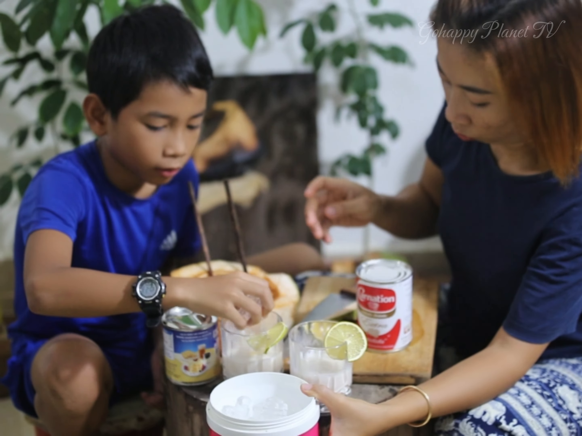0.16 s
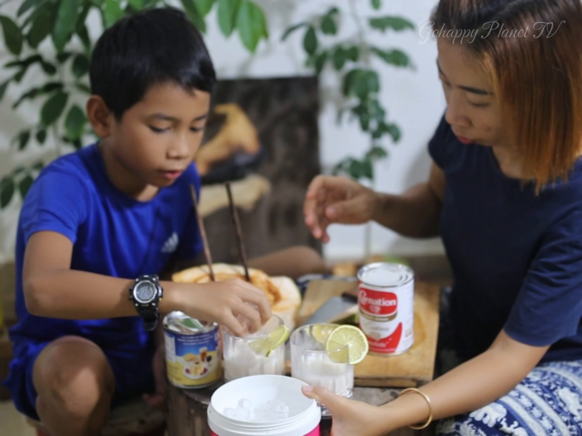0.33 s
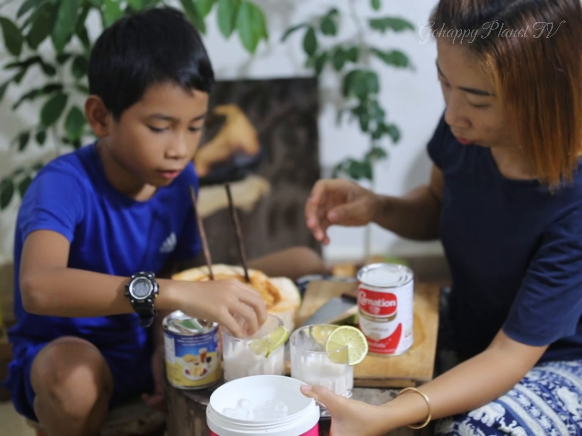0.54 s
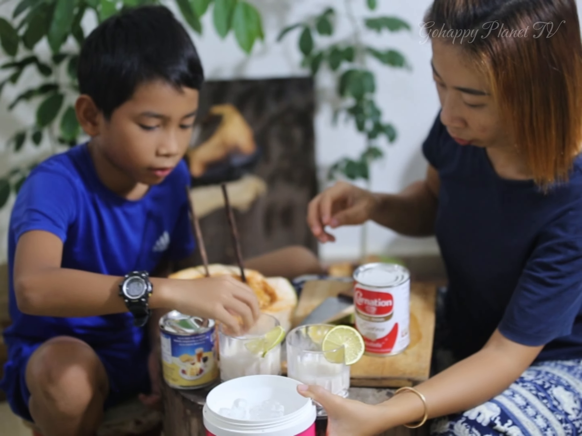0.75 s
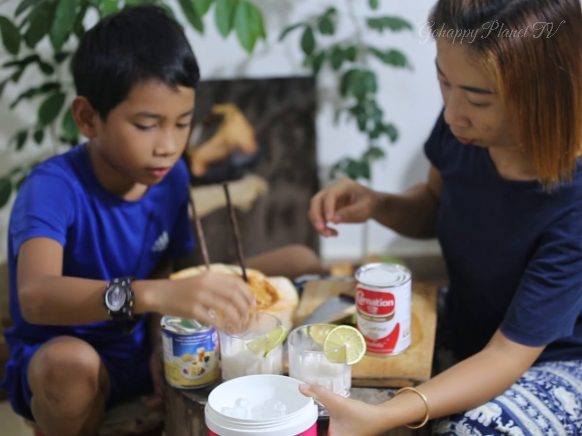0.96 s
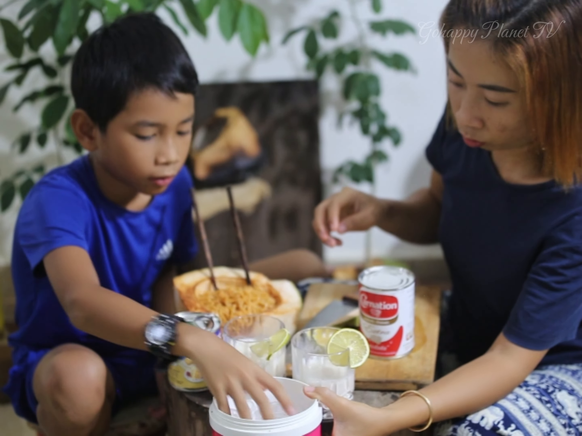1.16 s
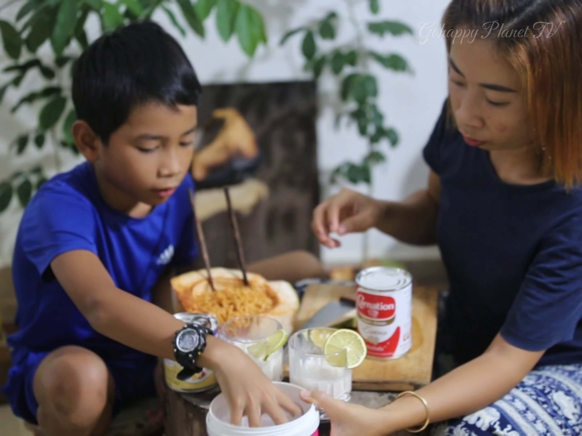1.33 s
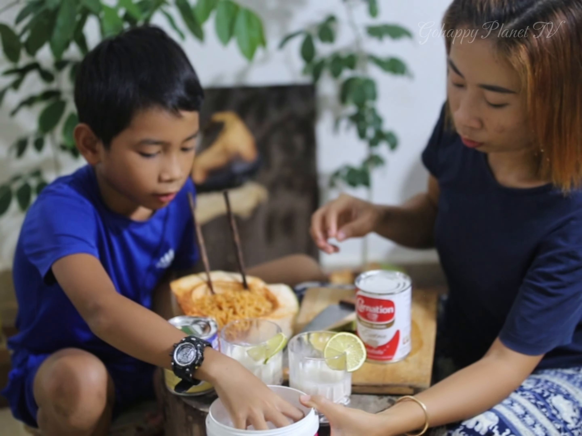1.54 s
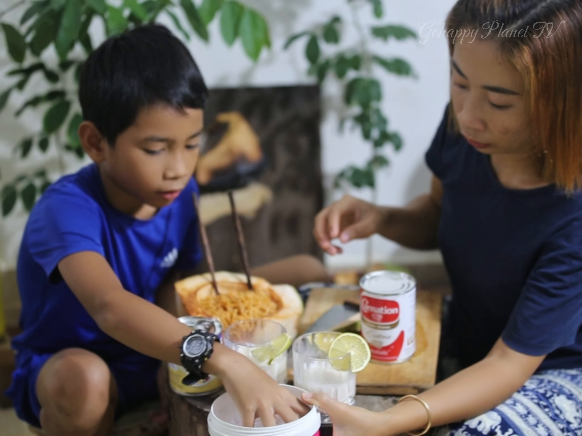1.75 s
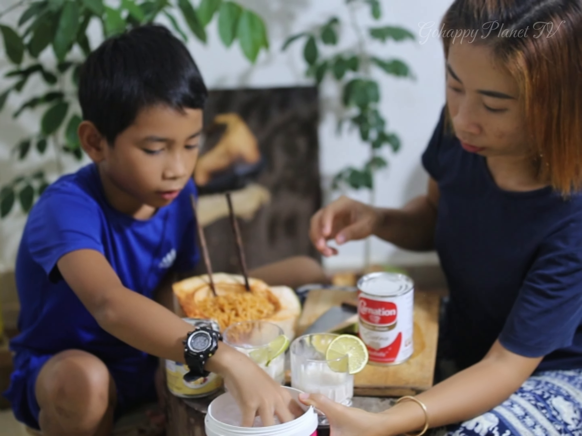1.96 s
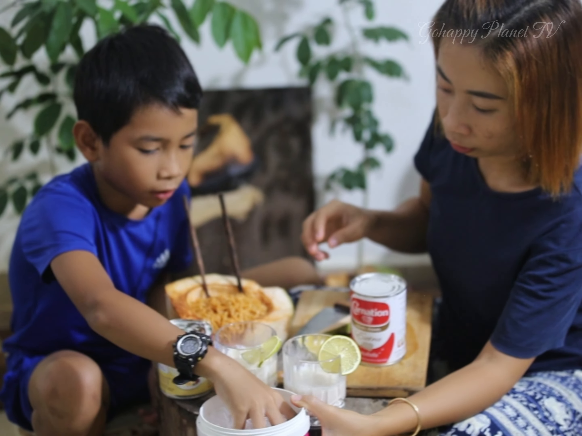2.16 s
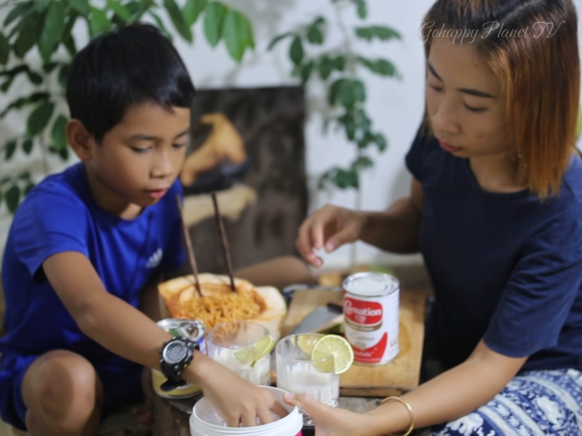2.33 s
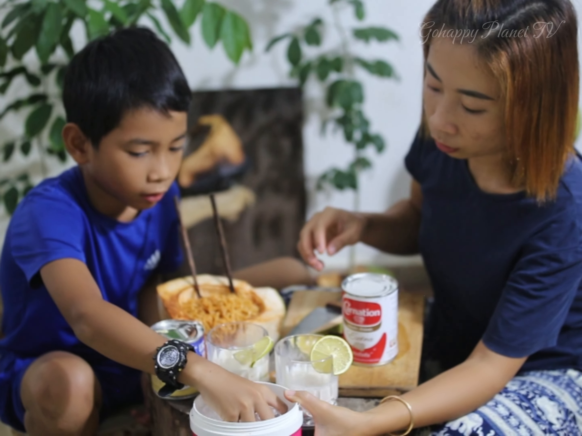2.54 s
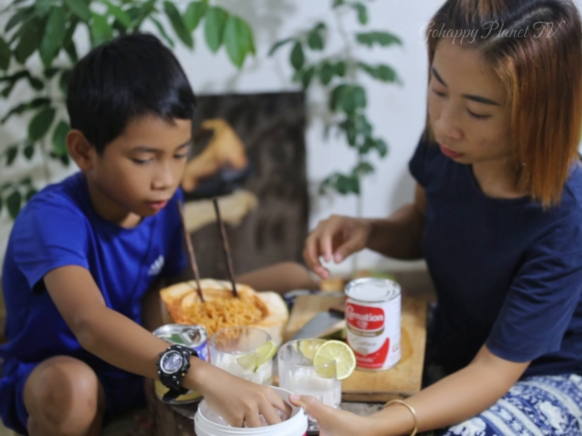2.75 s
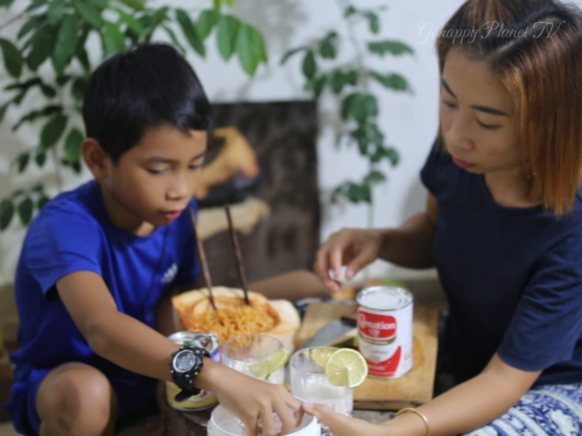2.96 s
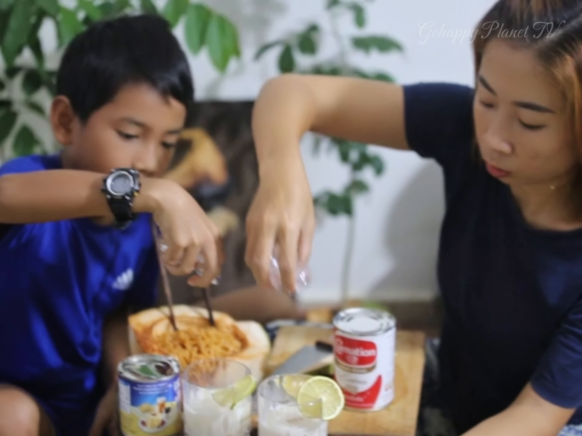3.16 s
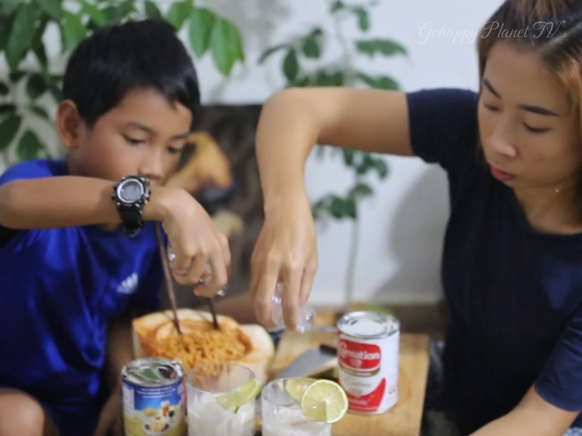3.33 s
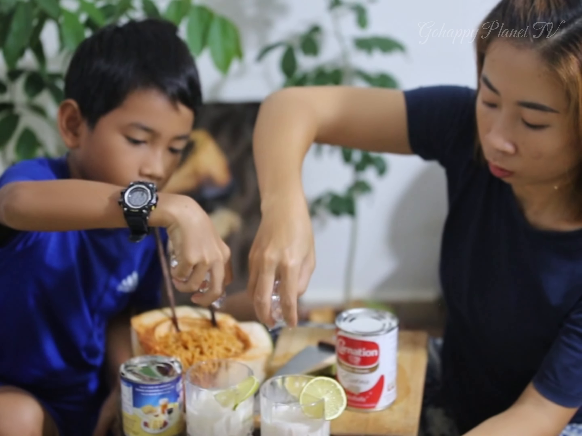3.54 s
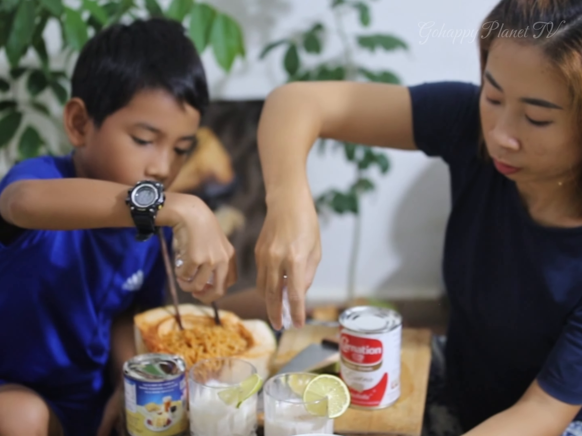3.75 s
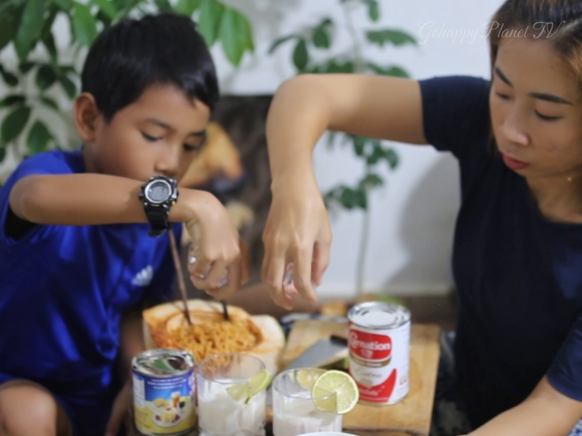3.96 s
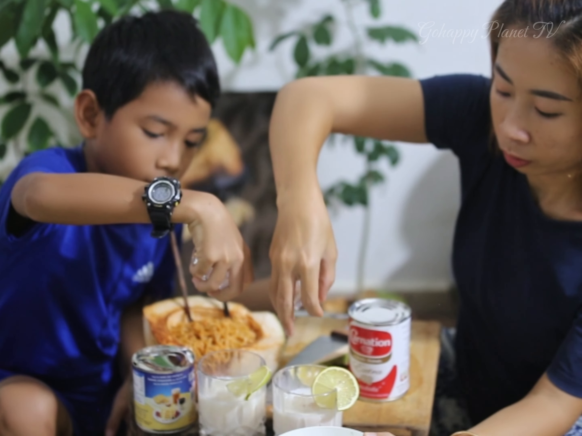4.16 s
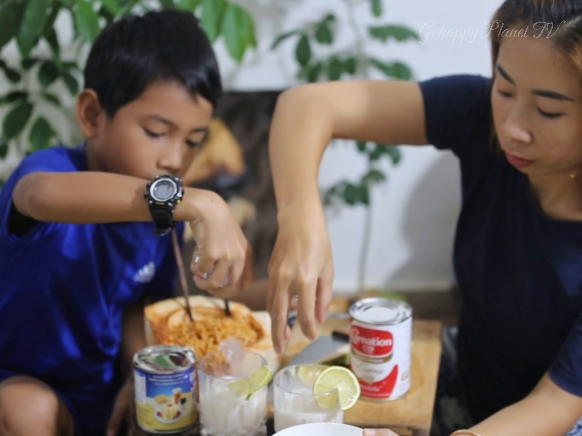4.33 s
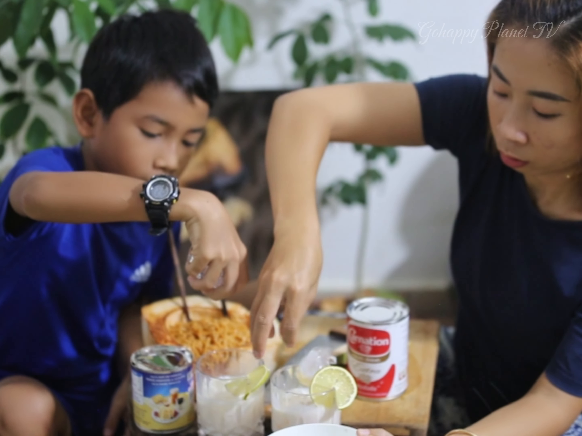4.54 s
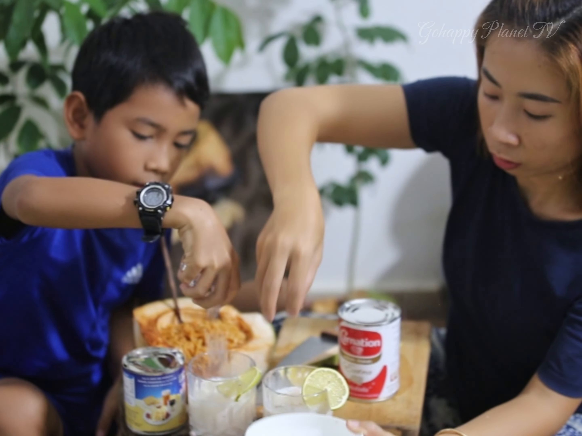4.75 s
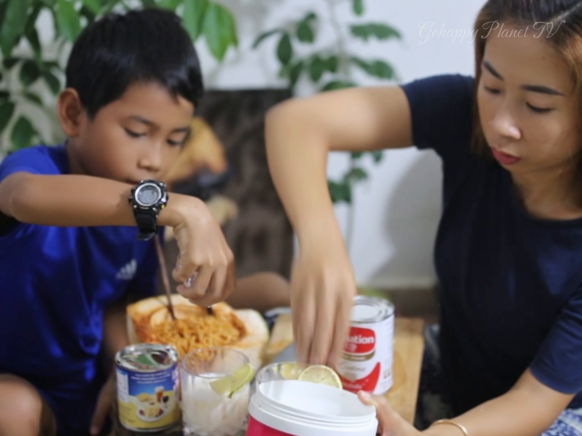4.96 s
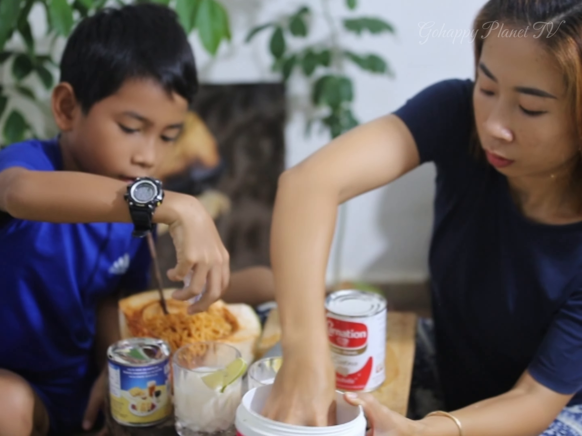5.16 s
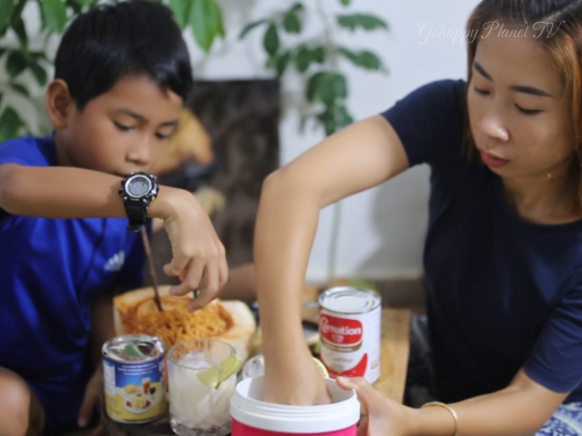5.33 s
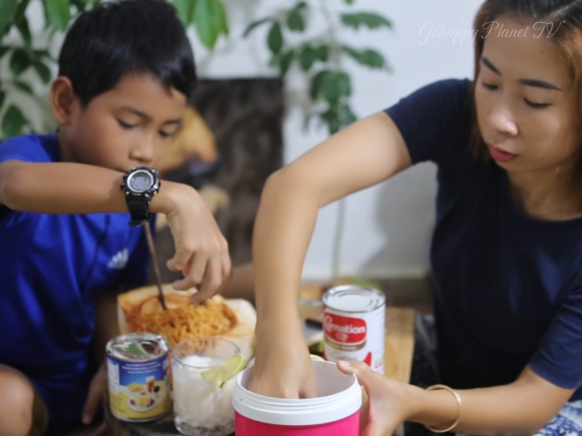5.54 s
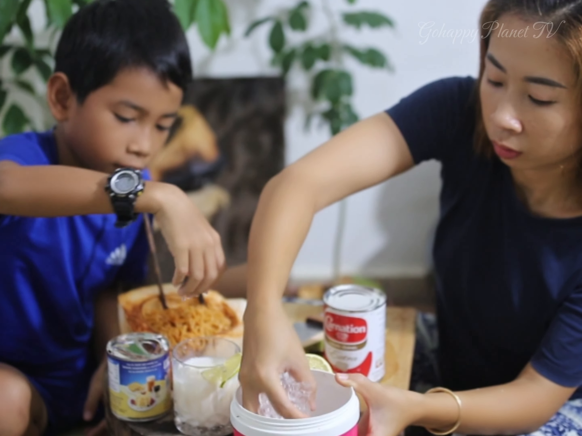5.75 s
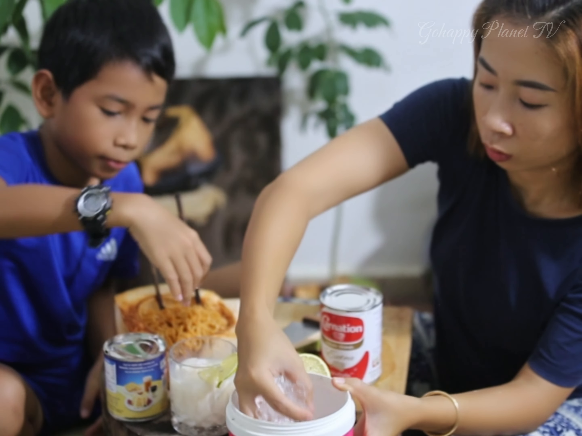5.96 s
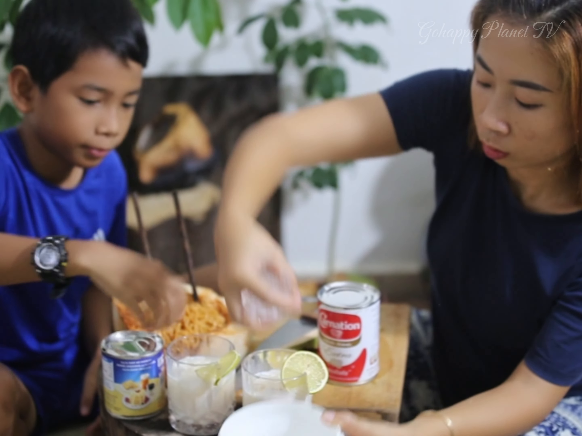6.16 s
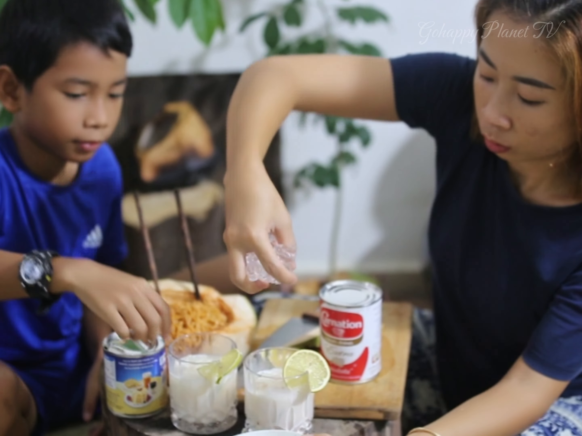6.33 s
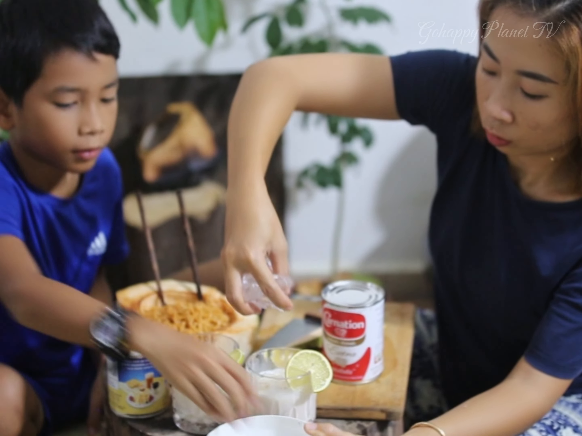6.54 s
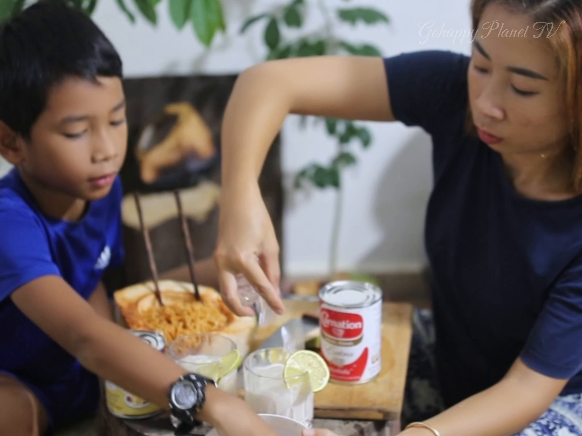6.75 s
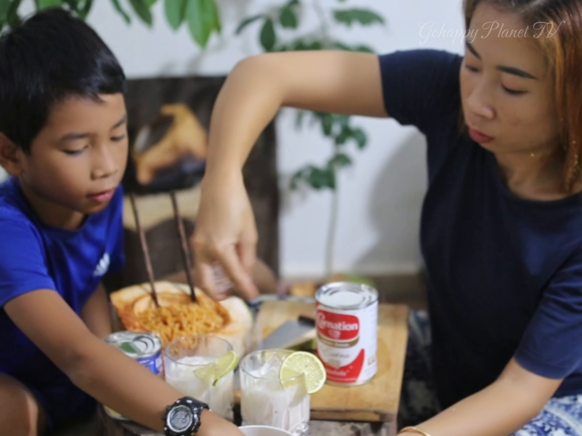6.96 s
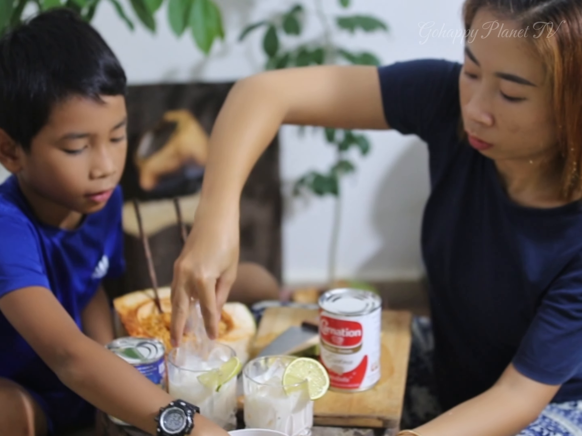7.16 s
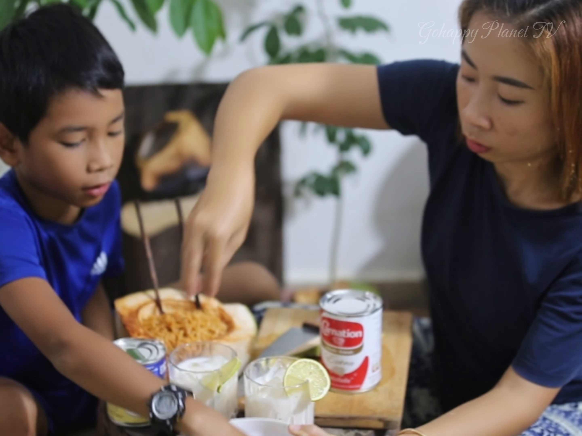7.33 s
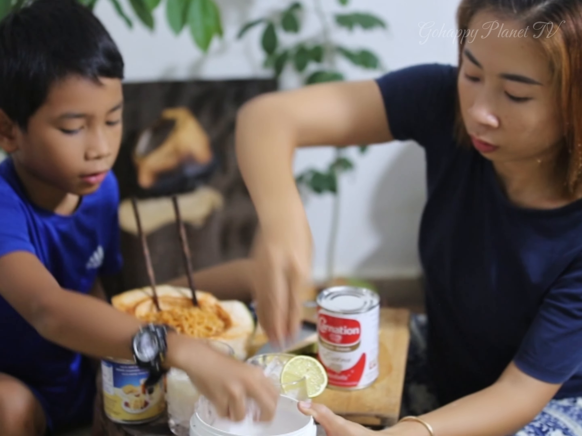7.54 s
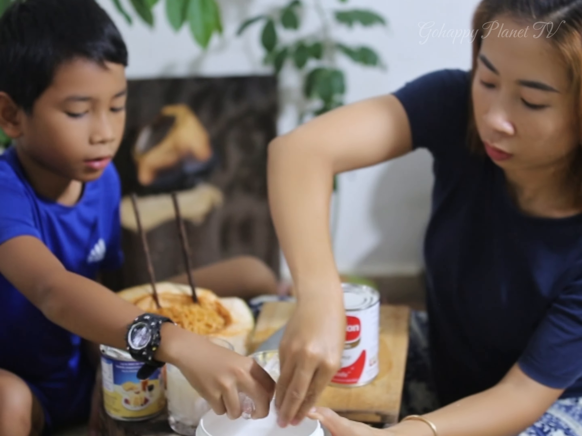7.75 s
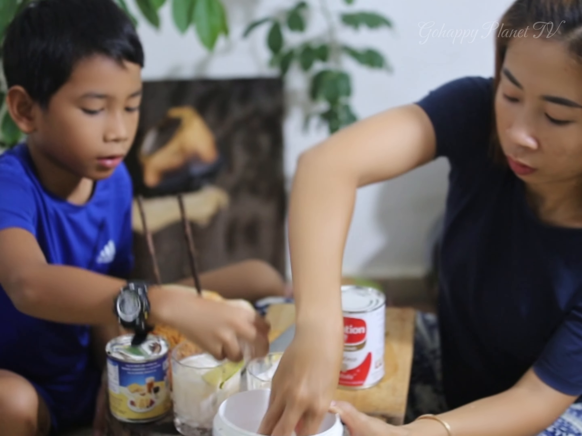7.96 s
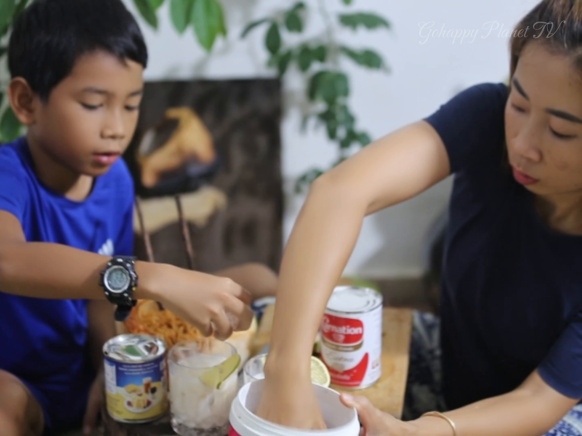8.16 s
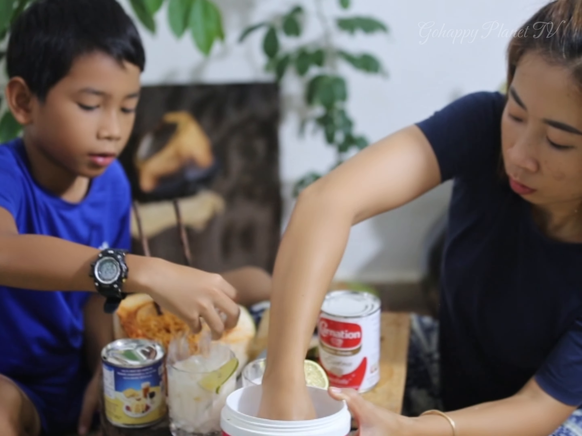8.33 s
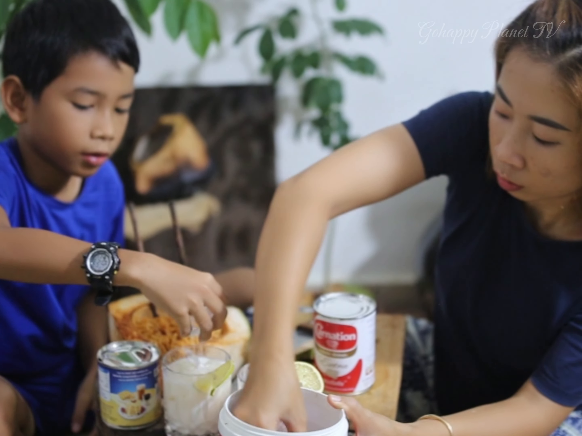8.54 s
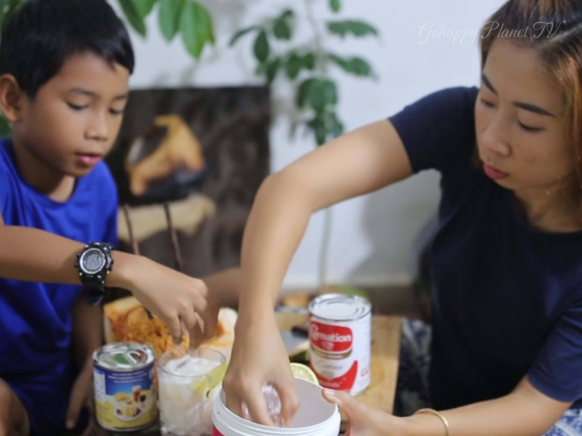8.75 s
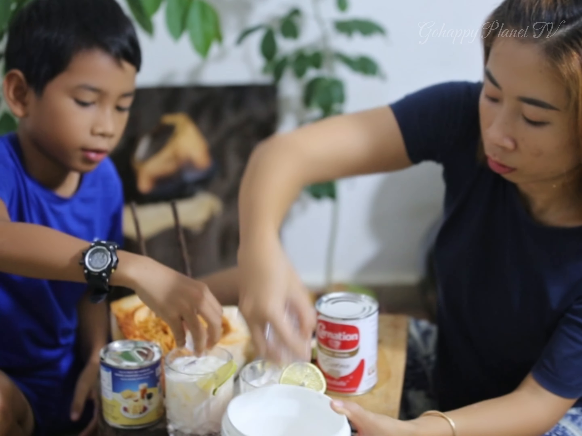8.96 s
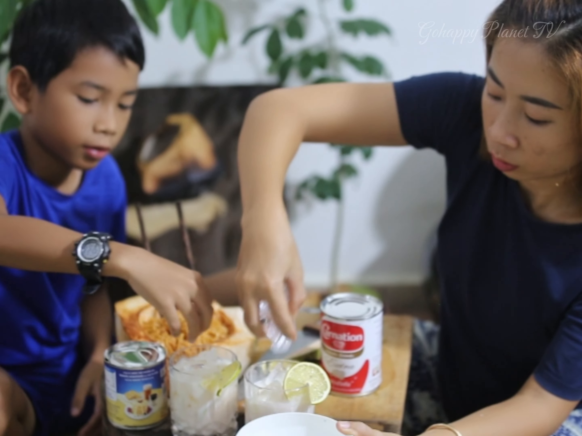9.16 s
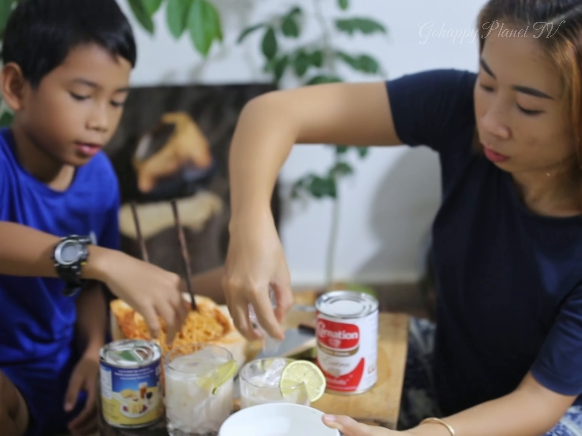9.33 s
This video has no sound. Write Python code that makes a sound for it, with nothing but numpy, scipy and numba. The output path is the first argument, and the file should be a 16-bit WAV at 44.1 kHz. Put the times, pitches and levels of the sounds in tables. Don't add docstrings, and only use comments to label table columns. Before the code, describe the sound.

Close up in a small quiet room, ice lands in drinking glasses with bright clinks and soft plops. A hand then digs through a plastic tub, pieces chattering and lumps knocking the wall. After a very brief silence, harder drops ring the fuller glasses, followed by more crunchy scooping, splitting snaps, wet slush and a few last chinks over low hum.

```python
import sys
import numpy as np
from scipy import signal
from scipy.fft import rfft, irfft, next_fast_len
from scipy.io import wavfile
from numba import njit

SR = 44100
rng = np.random.default_rng(int(sys.argv[2]) if len(sys.argv) > 2 else 0)


def log_audio(samples):
    frames = np.atleast_2d(samples).T
    limited = np.clip(frames, -1, 1)
    pcm = np.round(limited * 32767).astype(np.int16)
    wavfile.write(sys.argv[1], SR, pcm)


def amp(db):
    return 10 ** (np.asarray(db, float) / 20)


N = 414540
# (start_s, end_s)
SILENCE_S = (3.029, 3.142)


def level(x, db):
    return x * amp(db) / np.sqrt(np.mean(x ** 2))


def on_log(table, hz):
    f, db = np.transpose(table)
    return np.interp(np.log(hz), np.log(f), db)


def high_pass(x, order, hz):
    return signal.sosfilt(signal.butter(order, hz, "high", fs=SR, output="sos"), x)


def walk(rate_hz):
    return np.interp(np.arange(N) * rate_hz / SR, np.arange(1000), rng.standard_normal(1000))


@njit
def rings(size, start, hz, t60, gain, glide):
    out = np.zeros(size)
    for k in range(len(start)):
        p = np.exp(2j * np.pi * hz[k] / SR - np.log(1000.) / (t60[k] * SR))
        turn = np.exp(2j * np.pi * hz[k] * glide / (t60[k] * SR * SR))
        z = gain[k] + 0j
        for i in range(start[k], min(size, start[k] + int(t60[k] * SR))):
            out[i] += z.imag
            z *= p
            p *= turn
    return out


def ring(s, hz, t60, gain, glide=0.):
    s, hz, t60, gain = (np.ravel(v).astype(float) for v in np.broadcast_arrays(s, hz, t60, gain))
    start = np.clip(s * SR, 0, N).astype(np.int64)
    return rings(N, start, np.clip(hz, 20, SR / 2.2), np.clip(t60, .001, 1), gain, glide)


def knocks(s, db, hz, t60, lasting_s, spread_db, glide=0.):
    delay, detune = rng.random((2, 8, len(s)))
    return ring(s + lasting_s * delay, hz * amp(spread_db * (detune - .5)), t60, amp(db), glide)


def resonate(x, modes):
    out = 0
    for hz, db, t60 in modes:
        r = np.exp(-np.log(1000) / (t60 * SR))
        poles = [1, -2 * r * np.cos(2 * np.pi * hz / SR), r * r]
        out = out + level(signal.lfilter([1, 0, -1], poles, x), db)
    return out


# (pitch_hz, density_db)
HUM_SPECTRUM = [(12, -28), (20, 0), (99, 1.5), (265, 6.5), (323, -0.5), (382, 3), (652, -5), (2580, -10.5),
                (5520, -28), (7730, -28.5), (13900, -19), (15200, -20.5), (16500, -41.5)]
# (pitch_hz, level_db, t60_s)
WHINE_MODES = [(12300, -81, .03), (13800, -93, 0.036)]
HUM_DB, HUM_BEFORE_SILENCE_DB = -55, 5.5


def hum():
    size = next_fast_len(N)
    hz = np.maximum(np.fft.rfftfreq(size, 1 / SR), 1)
    spectrum = rfft(rng.standard_normal(size)) * amp(on_log(HUM_SPECTRUM, hz))
    swell = walk(1.0)
    out = 0
    for centre_octave in np.arange(4, 16, 1.5):
        band = np.clip(1 - np.abs(np.log2(hz) - centre_octave) / 1.5, 0, 1)
        waver_db = 0.15 * swell + 3.5 * walk(12.0)
        out = out + irfft(spectrum * band, size)[:N] * amp(waver_db)
    later = np.arange(N) / SR > SILENCE_S[0]
    step_db = np.where(later, 0, HUM_BEFORE_SILENCE_DB)
    return level(out, HUM_DB) * amp(step_db) + resonate(rng.standard_normal(N), WHINE_MODES)


def room(near):
    t60_s, room_db = 0.19, -10
    age = np.arange(SR // 2) / SR
    echo = rng.standard_normal(len(age)) * amp(-60 * age / t60_s) * (age > .004)
    echo = signal.lfilter([1], [1, -.4], echo)
    echo = echo / np.sqrt(np.sum(echo ** 2))
    return amp(room_db) * signal.fftconvolve(near, echo)[:N]


# (start_s, peak_db, pitch_hz)
CLOSE_CLICKS = [
    (0.2104, -12, 3600),
    (3.2165, -31, 8500),
    (3.2228, -16, 2000),
    (3.2237, -25.5, 7300),
    (4.8756, -5, 3420),
    (4.8765, -1, 4230),
    (7.224, -10, 4500),
]


def clicks():
    cycles, bounce_s, bounce_db = 3.4, 0.0034, -18
    s, db, hz = np.transpose(CLOSE_CLICKS)
    first = ring(s, hz, cycles / hz, amp(db))
    return first + ring(s + bounce_s, hz, cycles / hz, amp(db + bounce_db))


# (start_s, peak_db, pitch_hz, t60_s)
AIR_PLOPS = [(0.369, -26.5, 192, 0.04), (0.522, -25, 1446, 0.022), (0.824, -25.5, 1122, 0.11),
             (0.844, -29, 1294, 0.087), (0.847, -25.5, 387, 0.051), (0.884, -21, 890, 0.026),
             (0.893, -19.5, 1430, 0.065), (1.04, -23.5, 980, 0.024), (3.559, -14, 1580, 0.049),
             (3.6, -19, 1725, 0.045), (3.865, -26.5, 1360, 0.064), (4.583, -20, 230, 0.033),
             (4.618, -21.5, 1590, 0.04), (4.718, -19.5, 1692, 0.047), (5.024, -28, 453, 0.014),
             (6.234, -28.5, 204, 0.029), (6.316, -32, 316, 0.021), (6.345, -39, 248, 0.015),
             (8.892, -18, 493, 0.034), (9.062, -26.5, 193, 0.03)]
# (start_s, peak_db, pitch_hz, t60_s)
HELD_TAPS = [
    (1.4143, -29, 1400, 0.018),
    (3.261, -35.5, 2130, 0.012),
    (4.2, -31.5, 1870, 0.015),
    (6.2455, -34, 1010, 0.0082),
]


def plops():
    return amp(-8.0) * knocks(*np.transpose(AIR_PLOPS + HELD_TAPS), lasting_s=.018, spread_db=2.84, glide=0.033)


# (start_s, peak_db, pitch_hz)
CUBE_CHINKS = [(0.238, -22, 2480), (0.4344, -27, 2550), (0.7544, -17, 3140), (0.8929, -15, 3520),
               (1.2077, -38, 3880), (3.5642, -7.5, 2800), (3.8364, -6.5, 3260), (3.9521, -19, 3140),
               (4.8745, -0.5, 3480), (4.9477, -14.5, 3590), (7.0753, -34, 3700), (7.2704, -13, 3750),
               (9.124, -18, 3830), (9.198, -22.5, 3060), (9.315, -23, 2800)]


def cubes():
    return amp(-15.0) * knocks(*np.transpose(CUBE_CHINKS), t60=0.023, lasting_s=0.031, spread_db=2.0)


# (start_s, peak_db, pitch_hz)
DRY_TICKS = [(0.214, -13, 2920), (3.162, -32, 921), (7.2049, -21, 11000), (7.223, -16, 9000),
             (7.715, -15, 5060), (5.147, -6.5, 1750), (5.969, -22, 3080), (6.318, -30, 1170),
             (7.225, -15, 2730), (7.432, -15.5, 3920), (8.791, -13, 1750), (8.958, -10, 1700)]


def ticks():
    return amp(-16.0) * knocks(*np.transpose(DRY_TICKS), t60=.007, lasting_s=0.0013, spread_db=14.6)


# (start_s, peak_db, pitch_hz)
SLUSH_SMEARS = [(0.215, -39, 1240), (0.24, -32, 3200), (0.81, -21.5, 1210), (0.83, -30, 8560),
                (0.87, -27, 3500), (0.91, -25.5, 1690), (3.245, -42, 3000), (3.87, -24, 1280),
                (3.992, -30, 1410), (4.039, -28, 1470), (4.27, -39, 6240), (4.285, -39, 4200),
                (4.461, -25, 6300), (4.612, -21, 1300), (4.655, -31, 7000), (4.7, -25, 2660),
                (5.125, -22, 3800), (5.175, -19, 4000), (5.18, -17, 1440), (8.09, -35, 804),
                (8.17, -26, 770), (8.502, -22, 1540), (8.601, -17, 1490), (8.7, -18.5, 1710),
                (9.124, -30, 4300), (9.314, -40, 3500)]


def slush():
    return amp(-9.5) * knocks(*np.transpose(SLUSH_SMEARS), t60=0.03, lasting_s=.04, spread_db=2.3)


# (start_s, peak_db, pitch_hz)
ICE_SNAPS = [(3.164, -44, 2900), (8.1104, -28, 1700), (8.1292, -21, 1500), (3.239, -46, 2500),
             (3.951, -14, 3600), (3.958, -10, 3000), (4.881, -7, 3630), (5.15, -13, 3750),
             (0.2126, -12.5, 3970), (7.435, -12, 3940), (7.439, -15, 3900), (8.79, -27, 2500),
             (1.411, -25, 1600), (9.314, -25, 4800), (5.301, -20, 4240), (5.41, -10, 4580),
             (5.683, -20, 5500), (5.848, -20, 5300), (7.287, -8, 5030), (7.309, -19, 3500),
             (7.535, -24, 2980), (9.066, -24, 4470)]


def snaps():
    return amp(-17) * knocks(*np.transpose(ICE_SNAPS), t60=0.011, lasting_s=.0008, spread_db=7)


# (start_s, peak_db, pitch_hz)
TUB_KNOCKS = [(1.289, -28, 476), (1.56, -33, 541), (2.005, -23.5, 522), (2.289, -32, 549),
              (5.144, -19, 456), (5.195, -38, 457), (5.302, -20, 442), (5.347, -21, 556),
              (5.534, -23.5, 552), (5.793, -31, 458), (5.934, -30.5, 542), (5.968, -28, 555),
              (7.06, -23, 575), (7.535, -22.5, 564), (7.611, -24.5, 633), (7.716, -29, 607),
              (8.094, -26, 461), (8.18, -20, 563), (8.329, -16, 565), (8.414, -16, 600), (8.5, -21, 570),
              (8.644, -16, 524), (8.959, -33, 432)]


def tub_knocks():
    return amp(-12.5) * knocks(*np.transpose(TUB_KNOCKS), t60=0.085, lasting_s=0.0141, spread_db=1.0)


# (start_s, peak_db, pitch_hz, t60_s)
GLASS_SINGS = [(0.218, -14.5, 2166, 0.11), (0.433, -36, 3160, 0.12), (0.751, -31, 3150, 0.16),
               (3.575, -24, 5350, 0.12), (3.665, -44, 3000, .1), (3.835, -38, 2060, 0.23),
               (3.83, -28, 6660, .1), (4.02, -41, 3030, 0.16), (4.15, -50, 5200, .08),
               (4.416, -21, 2026, 0.26), (4.43, -34.5, 5100, 0.56), (4.572, -39, 14100, .2),
               (4.572, -34, 9250, .2), (4.93, -23.5, 2000, 0.12), (4.955, -36, 9240, 0.13),
               (5.02, -48, 5060, .2), (5.396, -22, 1988, 0.27), (5.41, -30, 5000, 0.15),
               (6.81, -30, 1820, .1), (7.073, -35, 6660, 0.044), (7.272, -22, 1930, .12),
               (7.342, -29, 1950, 0.17), (8.238, -14, 1846, 0.081), (9.045, -46, 1780, 0.14),
               (9.105, -41, 1860, .12), (9.155, -33, 1760, 0.1), (9.13, -41, 8250, .07),
               (9.233, -40, 1870, 0.1), (9.209, -45, 3150, .12)]
# (start_s, peak_db, pitch_hz, t60_s)
WALL_RINGS = [
    (0.452, -48, 2083, .5),
    (0.445, -58, 5246, .35),
    (0.815, -47, 5237, 0.34),
    (3.555, -17.5, 2061, 0.15),
    (3.558, -20, 2840, .13),
    (3.75, -58, 2065, .4),
    (4.03, -46, 2058, 0.75),
    (4.8745, -21, 2045, 0.14),
    (5.402, -23, 1992, 0.18),
]


def glass_sings():
    sings = amp(-12) * knocks(*np.transpose(GLASS_SINGS), lasting_s=.022, spread_db=0.202)
    s, db, hz, t60 = np.transpose(WALL_RINGS)
    return sings + ring(s, hz, t60, amp(db))


# (start_s, peak_db, first_mode_hz, upper_modes_db)
CLINKS = [(0.2113, -15.5, 2134, -6.5), (0.2243, -15.5, 2130, -17.5), (0.311, -31.5, 2092, -13.5),
          (0.3671, -38, 2130, -15), (0.4402, -33, 2055, -24), (0.5286, -45, 2060, -5),
          (0.6572, -33.5, 2093, -19), (0.755, -22.5, 2079, -10.5), (0.7825, -24.5, 2077, -7),
          (0.831, -30.5, 2070, -6), (0.863, -39, 2080, -9), (0.895, -29.5, 2075, -13),
          (1.0485, -38.5, 2090, -15), (1.1066, -38, 2043, -11), (1.18, -39, 2060, -29)]
# (start_s, peak_db, first_mode_hz, upper_modes_db)
FULLER_CLINKS = [(3.5543, -18, 1875, -12), (3.569, -22, 2056, -2.5), (3.829, -20, 2058, -3),
                 (3.951, -21.5, 2090, -17), (4.1, -52, 2000, -13), (4.4199, -29.5, 2013, -2),
                 (4.4484, -31.5, 2004, 6), (4.573, -27.5, 1973, -8), (4.68, -27, 1920, -12),
                 (4.8744, -25.5, 2030, 8), (4.9464, -32, 1990, 2.5), (5.026, -44, 1960, -3),
                 (5.406, -29, 1998, 6), (6.8115, -33.5, 1865, -3), (6.886, -26.5, 1980, -9),
                 (6.927, -27, 1850, -7), (7.2797, -25, 1958, -3), (7.3436, -33, 1865, -17),
                 (8.2356, -29, 1520, -11), (9.117, -33, 1770, -8), (9.19, -34, 1855, -18),
                 (9.3145, -28.5, 1827, -13), (9.363, -27, 1834, -28)]
# (nearly_empty_hz, level_db, t60_s, pitch_drop_share)
GLASS_MODES = [(2130, -4, 0.22, 1), (5293, -0.5, 0.14, 0.766), (9330, -4, 0.12, 0.48),
               (14250, -11.5, .07, .3)]
# (pitch_hz, level_under_blow_db, t60_s)
BOARD_MODES = [(137, -35.5, 0.18), (206, -27.5, 0.093), (301, -29, 0.17)]


def glasses():
    rattle_s, fuller_t60_ratio, fuller_blur = .03, .7, 0.029
    s, db, hz, upper_db = (c[:, None] for c in np.transpose(CLINKS + FULLER_CLINKS))
    drop = hz / GLASS_MODES[0][0]
    fuller = s > SILENCE_S[0]
    blows = []
    for k, (empty_hz, mode_db, t60, share) in enumerate(GLASS_MODES):
        when, pitch, force = np.moveaxis(rng.random((len(s), 3, 9)), 1, 0)
        when[:, 0] = 0
        force[:, 0] = 3
        blur = 0.011 + 0.091 * np.abs(1 - drop) + 0.0088 * (k > 0) + fuller_blur * fuller
        mode_hz = empty_hz * drop ** share * (1 + blur * (pitch - .5))
        mode_t60 = t60 * drop ** 1.8 * fuller_t60_ratio ** fuller
        soft_db = 0.051 * k * (db + 2.0)
        peak_db = db + mode_db + upper_db * (k > 0) + soft_db - 15.0
        gain = amp(peak_db) * (2.17 + force) * amp(-14 * when)
        blows.append(np.broadcast_arrays(s + rattle_s * when, mode_hz, mode_t60, gain))
    walls = ring(*np.moveaxis(blows, 1, 0))
    board_hz, board_db, board_t60 = np.transpose(BOARD_MODES)
    thud_db = db + board_db + 14.0 - 18 * ~fuller
    return walls + ring(s + 0.00376, board_hz, board_t60, amp(thud_db))


def pushes(rows, t, rise_db_s, fall_db_s):
    s, hold, db, chips_db, boom_db = (c[:, None] for c in np.transpose(rows))
    rise_db = rise_db_s * np.clip(s - t, 0, 1)
    fall_db = fall_db_s * np.clip(t - s - hold, 0, 1)
    power = amp(2 * (db - rise_db - fall_db))
    return amp(2 * np.hstack([0 * db, chips_db, boom_db])).T @ power


# (start_s, hold_s,
# chatter_db, chips_over_chatter_db, boom_over_chatter_db)
TUB_DIGS = [(1.29, 0.13, -43, -11, 3), (2.5, 0.13, -53.5, -10, -2.5), (1.53, 0.091, -39, -6.5, -5),
            (1.73, 0.0067, -49, -8, 6), (1.88, 0.013, -41.5, -13, -2), (2.015, 0.0041, -31, -10.5, -3),
            (2.09, 0.061, -42.5, -13, -5.5), (2.29, .14, -41, -13, -0.5),
            (2.67, 0.034, -41.5, -8.5, -2.5), (2.83, 0.059, -44.5, -8.5, 1),
            (3.0, 0.014, -47.5, -1.5, -1.5),
            (5.235, 0.084, -34, -10, -8.5), (5.318, 0.01, -32, -8.5, -4),
              (5.425, 0.0084, -34, -6.5, -6.5), (5.531, 0.027, -36.5, -10.5, -3),
              (5.657, 0.014, -35.5, -6.5, -5.5), (5.795, 0.011, -39, -5, -4),
              (5.85, 0.0081, -36.5, -8, -15), (5.948, 0.0224, -39, -6, -2.5), (6.016, 0.1, -48, -6, -12),
              (7.065, 0.15, -36.5, -6, -2), (7.247, 0.082, -34, -7.5, -9.5), (7.509, 0.031, -49, -17, 3.5),
              (7.62, 0.011, -36, -8, -2), (7.725, 0.0096, -38, -9, -4), (7.86, 0.12, -58.5, -9, 7),
              (8.12, 0.027, -50.5, -8, 9.5), (8.15, 0.12, -30.5, -10, 1), (8.319, 0.033, -32.5, -11, 2.5),
              (8.426, 0.13, -32.5, -8, 3), (8.598, 0.095, -33, -9, 0.5), (8.771, 0.2, -40, -18.5, 2),
              (9.009, 0.057, -53.5, -14, 8), (9.107, 0.046, -40.5, -13, -6), (5.15, 0.014, -39, -7, 7.5),
              (5.192, 0.022, -32, -12, -5.5), (5.345, 0.019, -33.5, -6, -5.5)]
# (start_s, hold_s, chatter_db, chips_over_chatter_db, boom_over_chatter_db)
SLIDES = [(0.24, 0.061, -45, -16, -26), (0.45, 0.04, -65, -7, 9.5), (0.765, 0.13, -40, -8, -17.5),
          (0.855, 0.034, -54, -17, 11), (1.0, 0.21, -59, -8, -2), (3.565, 0.019, -31, -7.5, -29),
          (3.845, 0.014, -32.5, -5, -16.5), (3.965, 0.0049, -23.5, -20, -31.5),
          (4.03, 0.021, -60, -27, -18), (4.43, 0.097, -44, -4, -14.5), (4.57, 0.11, -50, -9, -6),
          (4.71, 0.02, -39, -9, -19), (4.885, 0.04, -35, 1.5, -26), (6.72, 0.057, -55, -11, -32),
          (6.805, 0.034, -37, -2, -11), (6.88, 0.061, -36.5, -10, -11), (6.98, 0.053, -44, -8.5, -6.5),
          (9.22, 0.071, -51.5, -15, 3), (9.32, 0.073, -43, -11, -12)]
# (chatter_db, chips_db, boom_db)
REST_DB = (-71.5, -73.5, -85)


def handling(t):
    digs = pushes(TUB_DIGS, t, rise_db_s=361, fall_db_s=172)
    slides = pushes(SLIDES, t, rise_db_s=759.5, fall_db_s=328)
    return digs + slides + amp(2 * np.array(REST_DB))[:, None]


# (start_s, peak_db, chips_over_peak_db, clatter_t60_s)
LANDINGS = [(0.21, -12.5, -17, 0.056), (0.431, -30, -2.5, 0.13), (0.524, -35, -14, 0.18),
            (0.6579, -42, -6, 0.15), (0.714, -34, -1, 0.65), (0.748, -23.5, -4, 0.075),
            (3.551, -10, -9, 0.21), (3.8253, -13, -2, 0.16), (3.946, -11, -13, 0.29),
            (4.278, -38.5, -7, 0.65), (4.4154, -28, 2.5, 0.17), (4.57, -26, 4, 0.25),
            (4.662, -31.5, 3, 0.09), (4.8773, -7.5, 0.5, 0.087), (4.944, -16, -12, 0.16),
            (5.405, -13.5, -6, 0.063), (6.544, -41.5, -10, 0.42), (7.433, -31, -2, 0.32),
            (9.313, -25, -9.5, 0.16)]
# (start_s, peak_db, chips_over_peak_db, clatter_t60_s)
CRACKS = [(1.279, -25, -11.5, 0.24), (1.41, -24.5, -25, 0.16), (1.703, -26, -6.5, 0.19),
          (1.856, -30, -10.5, 0.32), (1.99, -20.5, -6.5, 0.29), (2.0892, -33, 7, 0.33),
          (2.271, -25, -8, 0.42), (2.808, -29.5, -3.5, 0.048), (5.1113, -35.5, 0.5, 0.15),
          (5.1487, -22.5, -10, .08), (5.178, -25, -0.5, .15), (5.3, -12.5, -7.5, .12), (5.531, -37, -4, .1),
          (5.6356, -30, -3, 0.14), (5.782, -31.5, 6, 0.12), (5.8476, -23, 0, .08), (5.9185, -34, -12, 0.14),
          (5.967, -20, 1.5, 0.059), (6.768, -33, -6, .15), (7.6093, -39, -12, .12),
          (8.086, -32.5, -15, 0.18), (8.451, -25, -7, .1), (8.646, -25.5, -11, .12),
          (1.5236, -25, -20, .12), (1.882, -41, -7, .1), (2.4056, -29, -6, .1),
          (2.6775, -25.5, -12.5, 0.12), (2.99, -30.5, 5.5, 0.087), (7.073, -16.5, 4, 0.06),
          (7.535, -23, -15, 0.068), (7.7134, -25, 0, 0.13), (8.003, -34.5, -8, 0.15),
          (8.7879, -25.5, -3, 0.24), (8.888, -18, -16, 0.12), (8.958, -37, -1, 0.16),
          (9.064, -30.5, -10, 0.085)]


def clatter(t, lump_db):
    attack_s, power = .004, 0
    for at, db, chips_db, t60 in LANDINGS + CRACKS:
        attack = np.clip((t - at) / attack_s + .5, 0, 1) ** 2
        fade = attack * amp(-120 * np.abs(t - at) / max(t60, .004))
        lumps_db = np.interp(at + 0.015, t, lump_db) - 0.2
        sizes_db = np.array([[lumps_db], [0], [chips_db]])
        power = power + amp(2 * (db - 12.0 + sizes_db)) * fade
    return power


# (pitch_hz, level_db, t60_s)
TUB_MODES = [(204, -27, 0.056), (346, -9.5, 0.093), (459, 2.5, 0.064), (541, 5, 0.091), (619, -13.5, 0.12),
             (657, -14.5, 0.071), (748, -18, .04), (1423, -3, 0.028), (1726, -16, 0.026)]


def tub_boom(push, jolts):
    thumps = rng.standard_normal(N) * (rng.random(N) < 500 / SR) * push * jolts
    return level(resonate(thumps, TUB_MODES), 0.082) * np.sqrt(np.mean(push ** 2))


# (pitch_hz, density_db)
ICE_SPECTRUM = [(350, -30), (600, 4), (922, -14), (1220, -7), (1320, -8), (1820, -6), (2210, -5),
                (3900, -5.5), (7800, -28), (11300, -25), (14600, -33.5), (15800, -43), (16500, -67)]


def chatter(lo_hz, hi_hz, cycles, rate_hz, spread_db):
    count = min(60000, int(rate_hz * N / SR))
    when, pitch, luck, life = rng.random((count, 4)).T
    hz = lo_hz * (hi_hz / lo_hz) ** pitch
    db = on_log(ICE_SPECTRUM, hz) + 20 * np.log10(hz) - spread_db * np.log(1 - luck)
    t60 = cycles * (.5 + 0.5 * life) / hz
    return level(ring(when * N / SR, hz, t60, amp(db)), 0)


# (lowest_hz, highest_hz, ring_cycles, knocks_per_s, force_spread_db)
PIECE_SIZES = [(797, 1918, 42, 1200, 0.5), (1865, 5600, 94, 3000, 2), (5765, 13450, 31, 6700, 0)]


def ice():
    step = 16
    t = np.arange(0, N, step) / SR
    main, chips, boom = handling(t)
    lump_db = np.clip(4 * np.log10(boom / main) - 1.5, -16, 4)
    power = np.array([main * amp(2 * lump_db), main, chips]) + clatter(t, lump_db)
    envelopes = np.repeat(np.sqrt(power), step, axis=1)[:, :N]
    jolts = amp(1.8 * walk(45))
    pieces = sum(e * chatter(*size) for e, size in zip(envelopes, PIECE_SIZES))
    push = np.repeat(np.sqrt(boom), step)[:N]
    return high_pass(pieces * jolts, 3, 750) + tub_boom(push, jolts)


# (pitch_hz, level_db, t60_s)
SYMPATHY_MODES = [(2060, -61, 0.55), (3140, -58.5, 0.11), (5280, -63, 0.26)]
WIDE_S = [.718, .892, 1.43, 1.475, 3.845, 3.945, 4.572, 4.872, 5.78, 8.01]


def scene():
    stirred = ice()
    near = stirred + resonate(stirred, SYMPATHY_MODES) + glasses() + glass_sings()
    near = near + plops() + cubes() + ticks() + slush() + snaps() + tub_knocks()
    near = high_pass(near + room(near), 2, 150)
    mid = near + hum() + high_pass(clicks(), 2, 900)
    nearest_s = np.abs(np.arange(N) / SR - np.array(WIDE_S)[:, None]).min(axis=0)
    wide = np.clip(2 - nearest_s / .006, 0, 1)
    side = amp(-12) * wide * high_pass(np.roll(mid, 300), 12, 5200)
    return np.array([mid + side, mid - side])


def low_pass(x):
    return signal.sosfilt(signal.butter(12, 16830, fs=SR, output="sos"), x)


def record(dry):
    t = np.arange(N) / SR
    fade_out = (SILENCE_S[0] - t) / .004
    fade_in = (t - SILENCE_S[1]) / .008
    gate = np.clip(np.maximum(fade_out, fade_in), 0, 1)
    mid = dry.mean(axis=0)
    rounded = dry - mid + np.tanh(.9 * mid) / .9
    noise_floor = 1e-6 * rng.standard_normal(N)
    top_cut = signal.ellip(10, .2, 75, 15900, fs=SR, output="sos")
    mix = signal.sosfilt(top_cut, rounded * gate + noise_floor)
    return low_pass(mix)


dry = scene()
out = record(dry)
log_audio(out)
```